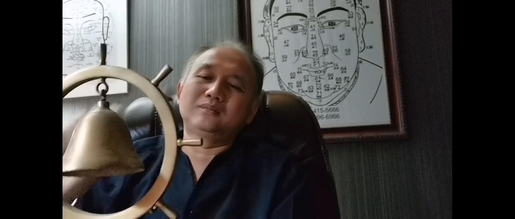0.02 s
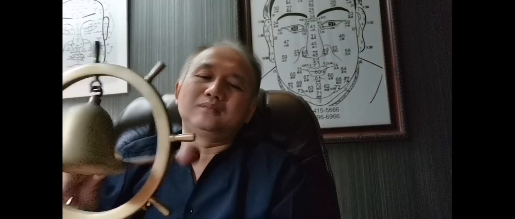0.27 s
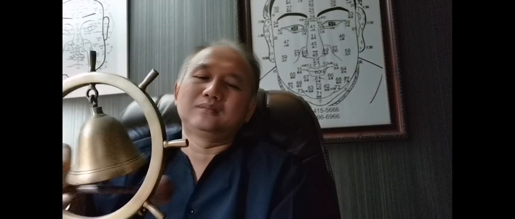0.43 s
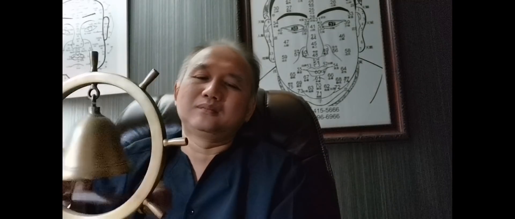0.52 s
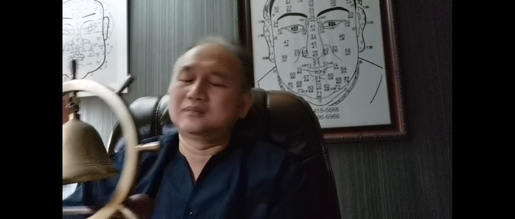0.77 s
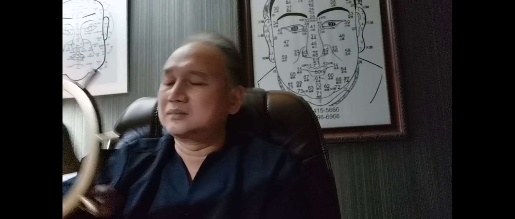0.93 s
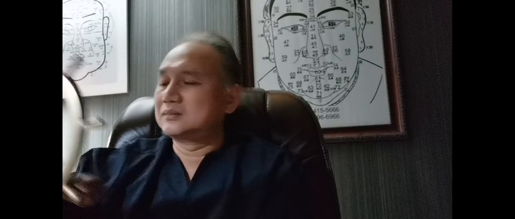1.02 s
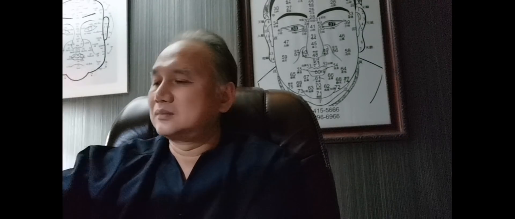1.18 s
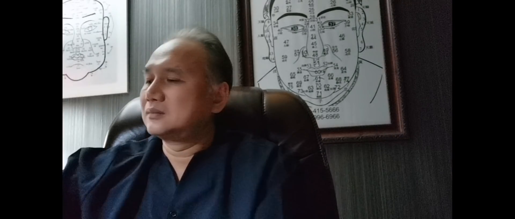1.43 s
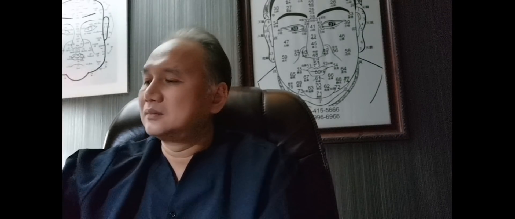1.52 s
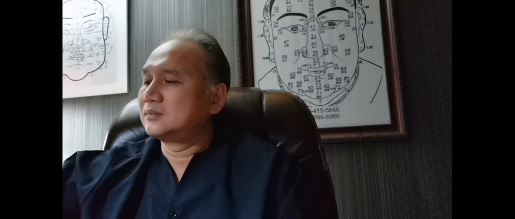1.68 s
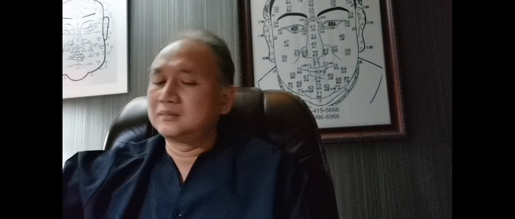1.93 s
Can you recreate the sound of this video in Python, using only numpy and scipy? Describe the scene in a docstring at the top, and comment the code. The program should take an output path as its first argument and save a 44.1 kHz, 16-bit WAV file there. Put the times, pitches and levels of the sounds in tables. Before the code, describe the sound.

A small brass bell is struck once and rings with a wavering, fading tone.

```python
"""Low room rumble and a faint knock, then one bright beater stroke on a small brass bell, close to a
stereo microphone in a small room. The bell hangs in a ring stand and swings as it rings: its partials
come in close pairs that beat, and they swell and sink differently at each microphone.
The hook chinks and the stand takes a few light knocks as it is handled."""
import sys
import numpy as np
from scipy import signal
from scipy.fft import rfft, irfft
from scipy.io import wavfile

SR = 44100
rng = np.random.default_rng(int(sys.argv[2]) if len(sys.argv) > 2 else 0)


def int16_out(signal):
    """Quantize to a 16-bit WAV file."""
    q = np.round(np.clip(np.atleast_2d(signal).T, -1, 1) * 32767)
    wavfile.write(sys.argv[1], SR, q.astype(np.int16))


N = 85995
T = np.arange(N) / SR
HZ = np.fft.rfftfreq(N, 1 / SR)
STRIKE_S, ATTACK_S = .2385, .0007
PRIME_HZ, HUM_HZ = 2890.6, 1156.9

# loudest partial at the microphones: t/s, left level/dB, right level/dB, right lag/ms
PRIME_AT_MICS = [(0.24, -15, -19.0, -0.094), (0.27, -29, -16.5, -0.053), (0.31, -14.5, -15.5, 0.12),
                 (0.42, -10, -22.5, -0.0011), (0.48, -12.5, -20, -0.042), (0.56, -16.5, -8, 0.24),
                 (0.61, -16, -17.5, 0.27), (0.66, -13, -31.5, 0.26), (0.72, -16.5, -25, -0.097),
                 (0.81, -31, -16.0, 0.053), (0.91, -18.5, -20, 0.19), (0.97, -23, -25.0, 0.1),
                 (1.06, -20, -25, 0.1), (1.16, -21.5, -43.5, 0.031), (1.3, -25.5, -30.5, 0.08),
                 (1.43, -29, -42.0, -0.14), (1.52, -46, -40.5, -0.2), (1.61, -31.0, -41.5, -0.21),
                 (1.72, -48.0, -54.5, -0.024), (1.82, -47, -51.0, 0.095), (1.95, -39.5, -41.5, 0.18)]
# lowest partial: t/s, left level/dB, right level/dB, left beat/Hz, right beat/Hz, right lag/ms
HUM_AT_MICS = [(0.24, -29.5, -29, 4.44, 3.04, 0.1), (0.42, -17.5, -16.5, 8.62, 2.01, 0.085),
               (0.6, -24, -18, 5.99, 11.78, 0.42), (0.8, -19, -20.5, 9.74, 3.78, -0.74),
               (1.0, -24.5, -18, 6.33, 8.25, -0.27), (1.2, -25, -26.5, 8.76, 6.97, -0.38),
               (1.45, -26.5, -29.5, 7.42, 7.003, -0.28), (1.7, -38, -31.5, 6, 7.8, -0.19),
               (1.95, -32, -28.5, 6.8, 7.64, 0.02)]
# its beat, left row then right: first trough/s, weaker tone/ratio
HUM_TROUGHS = [(.239, 0.6), (.302, 0.69)]
# upper pairs of partials: f/Hz, split/Hz, level/dB, t60/s
UPPER_PAIRS = [(1747, 3.6, -51, 1.4), (2314.4, 14, -39.5, 3.23), (4074, 8.7, -36, 1.7),
               (4867.4, 28, -16.5, 1.496), (5823, 8.9, -46, 1.2), (6685, 9, -27, .4),
               (6734, 4.9, -20, 0.82), (7170, 4, -24.5, 0.86), (8005, 7, -43.5, .55),
               (8320, 5, -18.5, 0.35), (10145, 8.8, -25, 0.55), (11130, 27, -24, 0.48),
               (14515, 9, -44, .45)]
# outline of the bell's dense high modes: f/Hz, relative level/dB
SHIMMER_SPECTRUM = [(5000, -40.5), (6700, -1.5), (8300, 7), (9000, -32.5), (10100, -6), (11300, -6.5),
                    (12100, -31), (13300, -1), (15500, -4.5), (16500, -16)]
# the beater's clack: f/Hz, relative level/dB
CLACK_SPECTRUM = [(30, -5), (100, 2.5), (165, -17), (420, -20), (810, -8), (1400, -11.5), (2000, -5),
                  (3200, -15), (4150, 8.5), (5400, -21.5), (8000, -32.5), (12000, -30.5), (16000, -16.5)]
# thump and woody modes of beater and stand: f/Hz, level/dB, t60/s
WOOD_MODES = [(55.4, -35.5, .12), (85, -33, 0.088), (290, -42, 0.085), (468.5, -45.5, .28), (800, -37, .35),
              (842, -40.5, 0.6), (1034, -37, .25), (1512, -34, .15), (1875, -35.5, .17)]
# knocks on the stand: t/s, level/dB, tilt/(dB per octave)
STAND_KNOCKS = [(0.029, -53.5, -7), (0.6177, -30.5, 2.5), (.6444, -35, -4), (0.7074, -33, 5),
                (1.568, -54.5, -10.5), (1.667, -52, -9.5)]
# a knock before its tilt: f/Hz, relative level/dB
KNOCK_SPECTRUM = [(200, -21.5), (500, -16.5), (800, 9), (1500, 10), (2200, 3.5), (3200, -5), (4200, -0.5),
                  (5400, -19), (9000, -23), (16000, -39)]
# hook and stand chinks: t/s, rise/s, f/Hz, ring level/dB, t60/s, scrape level/dB, scrape width/octaves
HOOK_CHINKS = [(.025, .005, 6200, -79, .15, -78, 0.19), (0.4889, 0.014, 13200, -30, 0.29, -58, 0.81),
               (.5094, .002, 13600, -47.5, 0.15, -43, 1), (0.9268, 0.0047, 6060, -55, 0.21, -54, 0.09),
               (1.362, 0.028, 6913, -64.5, 0.27, -62.5, 0.79),
               (1.658, 0.0035, 8915, -40, 0.29, -47.5, 0.11), (1.66, 0.01, 10330, -55, 0.4, -52.5, 0.1),
               (1.665, 0.0042, 1990, -45.5, .16, -73, .3)]
# the small room's decay: f/Hz, t60/s
ROOM_DECAY = [(80, .12), (300, 0.45), (900, 0.61), (4000, 0.38), (9000, 0.33), (15000, 0.13)]
# room tone colour: f/Hz, relative level/dB
RUMBLE_SPECTRUM = [(20, -7), (50, -13.5), (90, -2.5), (200, 3.5), (350, -3), (550, -20.5), (900, -15),
                   (2000, -28.5), (4000, -38.5), (6000, -42), (16000, -47)]
# room tone loudness: t/s, level/dB
RUMBLE_LEVELS = [(0, -54.5), (.22, -58), (.35, -73), (.6, -57), (1., -55), (1.95, -54.5)]


def prime():
    """The loudest partial swells and sinks as the bell swings through the room's standing waves."""
    left_db, right_db, lag_ms = curves(PRIME_AT_MICS)
    return amp([left_db, right_db]) * (carrier(PRIME_HZ, lag_ms) * flutter(depth=.097)).imag


def hum():
    """The lowest partial: two close tones that beat deeply, unevenly because the bell swings."""
    left_db, right_db, left_hz, right_hz, lag_ms = curves(HUM_AT_MICS)
    pairs = []
    for db, beat_hz, (trough_s, twin) in zip((left_db, right_db), (left_hz, right_hz), HUM_TROUGHS):
        beats = np.cumsum(beat_hz) / SR
        turn = np.exp(1j * np.pi * (beats - np.interp(trough_s, T, beats)))
        pairs.append(amp(db) * (turn - twin / turn))
    return (np.array(pairs) * carrier(HUM_HZ, lag_ms)).imag


def overtones(twin_db=-1, spread_rad=.35, ducked_gain=.46, recovery_s=.36):
    """Upper pairs beat as they die away; each microphone picks up the beat a little apart."""
    out, age = np.zeros((2, N)), np.maximum(T - STRIKE_S, 0)
    for hz, split_hz, db, t60 in UPPER_PAIRS:
        beat = np.exp(1j * (np.pi * (split_hz * age + rng.random()) + spread_rad * sway()))
        phase = 2 * np.pi * (hz * age + rng.random()) + sway()
        pair = (1 / beat + amp(twin_db) * beat) * np.exp(1j * phase) * flutter(depth=.26)
        out += amp(db) * fade(STRIKE_S, t60) * pair.imag
    # upper partials are ducked at the stroke and swell back as the recorder's gain recovers
    recovery = 1 - (1 - ducked_gain) * np.exp(-age / recovery_s)
    return out * onset(STRIKE_S, ATTACK_S) * recovery


def shimmer(count=110, level_db=-29):
    """The crowd of weak, short high modes of the brass."""
    place, size, life = rng.random((count, 3)).T
    span_hz = SHIMMER_SPECTRUM[0][0], SHIMMER_SPECTRUM[-1][0]
    mode_hz = np.interp(np.arange(count) + place, [0, count], span_hz)
    gains = unit(amp(over_pitch(SHIMMER_SPECTRUM, mode_hz)) * size) * np.sqrt(2 / count)
    t60s = .2992 + .952 * life
    return amp(level_db) * sum(gain * ring(hz, t60) for hz, gain, t60 in zip(mode_hz, gains, t60s))


def beater(clack_db=-15):
    """The blow from close up: a clack and a woody ring."""
    wood = sum(amp(db) * ring(hz, t60) for hz, db, t60 in WOOD_MODES)
    return amp(clack_db) * hit(STRIKE_S, over_pitch(CLACK_SPECTRUM), t60=.05, wet_db=-3) + wood


def knocks():
    """Light handling knocks on the stand, some duller, some brighter."""
    octaves = np.log2((HZ + 100) / 2000)
    return sum(amp(db) * hit(start, over_pitch(KNOCK_SPECTRUM) + tilt * octaves, t60=.081, wet_db=-2)
               for start, db, tilt in STAND_KNOCKS)


def chinks(half_width_hz=23, skirt_db=-34.5):
    """The metal hook and stand scrape and ring briefly."""
    out = np.zeros((2, N))
    for start, rise, hz, ring_db, t60, scrape_db, width in HOOK_CHINKS:
        tone = noise(resonance_db(hz, half_width_hz))
        out += amp(ring_db) * tone * onset(start, rise) * fade(start, t60)
        band = np.exp(-(np.log2((HZ + 1) / hz) / width) ** 2) + amp(skirt_db)
        out += amp(scrape_db) * hit(start, 20 * np.log10(band), t60=.2, wet_db=-3.5, rise=rise)
    return out


def hit(start, shape_db, t60, wet_db, rise=ATTACK_S):
    """A contact's noise burst at the microphones, with the room's tail behind it."""
    shape_db = shape_db + ripple()
    tail = room_tail(start, shape_db)
    burst = noise(shape_db, likeness=.27) * fade(start, t60)
    return onset(start, rise) * (burst + amp(wet_db) * tail / 2)


def ripple(depth_db=8, spacing_hz=89.6):
    """Each contact wakes its own uneven resonances: random peaks and dips in dB."""
    heights = rng.standard_normal(4096)
    return depth_db * np.interp(HZ / spacing_hz, np.arange(len(heights)), heights)


def sway():
    """Slow phase drift from the swing, 1 radian rms at each microphone."""
    speed, phase = rng.random((2, 2, 8, 1))
    rate_hz = .75 + 1.5 * speed
    return np.array([unit(waves.sum(0)) for waves in np.sin(2 * np.pi * (rate_hz * T + phase))])


def flutter(depth, rate_hz=25.2):
    """Room reflections make a partial's level and phase waver at each microphone."""
    shape_db = resonance_db(0, rate_hz)
    return 1 + depth * (noise(shape_db) + 1j * noise(shape_db))


def room_tail(start, shape_db):
    """The small room's diffuse answer, each band dying at its own speed."""
    hz, t, bands = signal.stft(noise(shape_db), SR, nperseg=256)
    decay = fade(start, over_pitch(ROOM_DECAY, hz)[:, None], t)
    return signal.istft(bands * decay, SR)[1][:, :N]


def rumble():
    """Low room tone, much alike at both microphones; it dips briefly after the stroke."""
    return amp(curves(RUMBLE_LEVELS)) * noise(over_pitch(RUMBLE_SPECTRUM), likeness=.73)


def carrier(hz, lag_ms):
    """A partial's rotating phase from the stroke on, shifted in time at the right microphone."""
    age = np.array([T, T - lag_ms / 1000]) - STRIKE_S
    return np.exp(2j * np.pi * hz * age) * onset(STRIKE_S, ATTACK_S)


def ring(hz, t60, max_lag_s=.0005):
    """One mode woken by the blow, reaching each microphone with its own small delay."""
    age = T - STRIKE_S - max_lag_s * rng.random((2, 1))
    return np.sin(2 * np.pi * hz * age) * onset(STRIKE_S, ATTACK_S) * fade(STRIKE_S, t60)


def noise(shape_db, likeness=0):
    """Stereo noise of a given colour and left-right likeness."""
    left, other = rng.standard_normal((2, N))
    right = likeness * left + np.sqrt(1 - likeness ** 2) * other
    return unit(irfft(rfft([left, right]) * amp(shape_db), N))


def resonance_db(hz, half_width_hz):
    """A spectral peak, 6 dB down at the half width."""
    return -20 * np.log10(1 + ((HZ - hz) / half_width_hz) ** 2)


def onset(start, rise):
    """Ramp from silence to 1."""
    return np.clip((T - start) / rise, 0, 1)


def fade(start, t60, t=T):
    """Exponential decay from 1."""
    return np.exp(-np.log(1000) * np.maximum(t - start, 0) / t60)


def curves(rows):
    """Reads a timed table's columns at every sample."""
    times, *columns = np.transpose(rows)
    return [np.interp(T, times, column) for column in columns]


def over_pitch(points, hz=HZ):
    """Reads a spectrum on a log-frequency axis."""
    f, value = np.transpose(points)
    return np.interp(np.log(hz + 1), np.log(f), value)


def amp(db):
    """Decibels to gain."""
    return 10 ** (np.asarray(db) / 20)


def unit(x):
    """Scales to rms 1."""
    return x / np.sqrt(np.mean(x ** 2) + 1e-20)


def scene():
    """Bell, beater and stand close to the microphone, the room behind."""
    bell = prime() + hum() + overtones() + shimmer()
    return bell + beater() + knocks() + chinks() + rumble()


def record(dry):
    """The recorder's band ends at 16 kHz."""
    taps = signal.firwin(255, 16000, window=("kaiser", 9), fs=SR)
    return signal.oaconvolve(dry, taps[None], "same")


dry = scene()
out = record(dry)
int16_out(out)
```